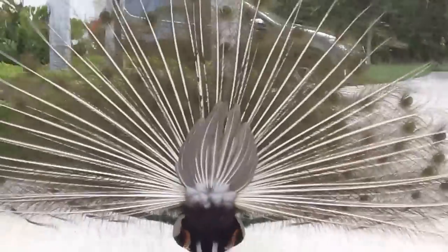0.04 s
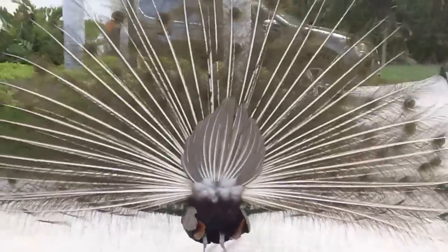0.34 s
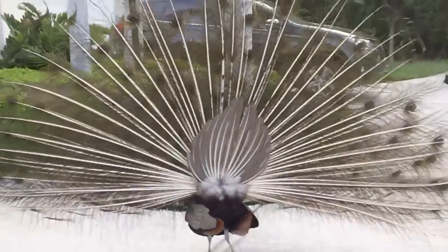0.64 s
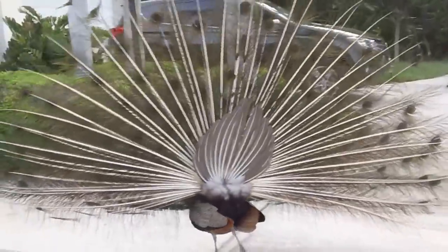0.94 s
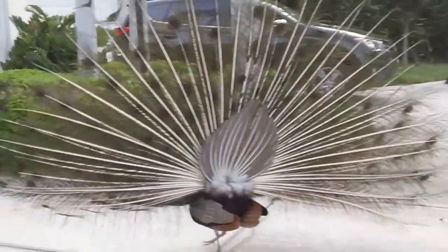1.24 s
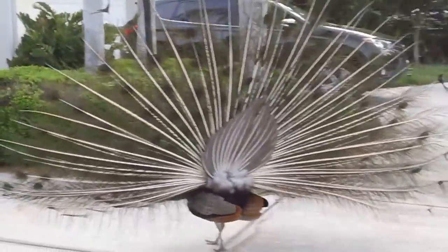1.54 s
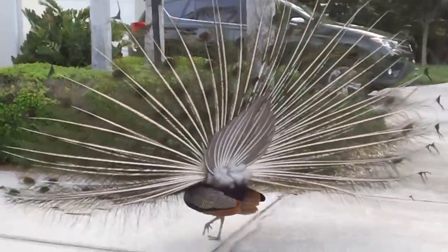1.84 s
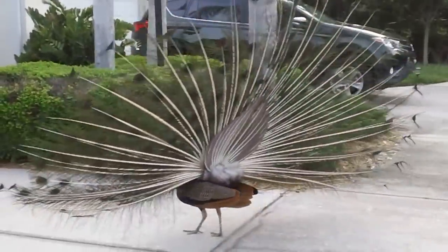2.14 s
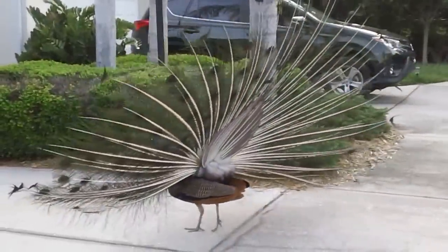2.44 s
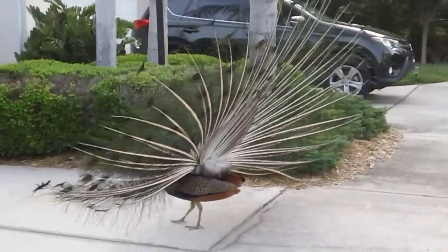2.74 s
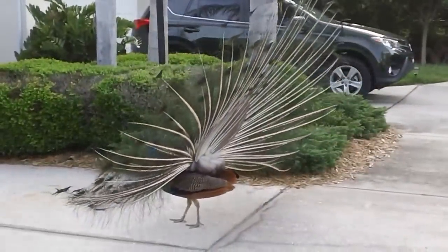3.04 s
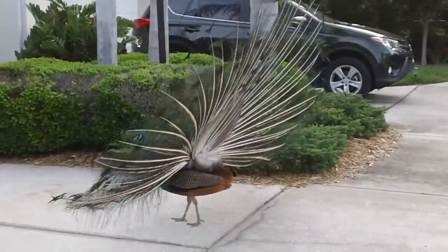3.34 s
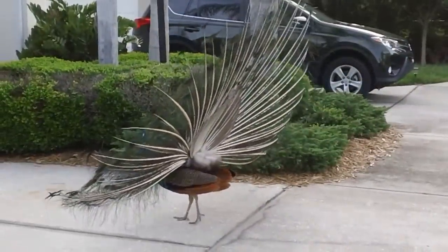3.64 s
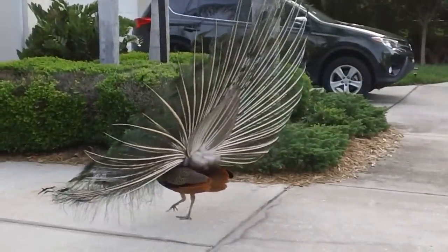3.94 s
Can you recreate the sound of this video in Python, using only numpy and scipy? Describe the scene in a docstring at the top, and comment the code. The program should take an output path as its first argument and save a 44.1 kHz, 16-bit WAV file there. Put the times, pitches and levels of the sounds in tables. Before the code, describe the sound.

Peacock feathers click and rustle close by over a low roar of distant traffic.

```python
"""Dry clicks, knocks and rustles of a peacock's fanned train, close up, as it turns on a concrete drive.
Stiff quills skid and knock together, vanes brush over each other in short strokes, and barbs unhook
with tiny ticks; the yard adds a short, dull scatter. Behind the bird the roar of distant traffic swells
and fades over a low rumble, open-air hiss and the faint hum of far engines."""
import sys
import numpy as np
from scipy import signal
from scipy.fft import rfft, irfft
from scipy.io import wavfile
from scipy.ndimage import uniform_filter1d

SR = 44100
rng = np.random.default_rng(int(sys.argv[2]) if len(sys.argv) > 2 else 0)


def generate_wav(sig):
    """Save sig (samples, or channels by samples) to the path in sys.argv[1] as 16-bit PCM at SR."""
    pcm = np.round(np.clip(np.atleast_2d(sig).T, -1, 1) * 32767).astype(np.int16)
    wavfile.write(sys.argv[1], SR, pcm)


N = 176400
QUILL_LOW_HZ = 970  # thin quills radiate little below this
# modes of a thick and a thin quill shaft: pitch_hz, gain_db, t60_s
THICK_SHAFT = [(1240, -15, 0.0067), (1600, -1.5, 0.0072), (2230, 2, 0.0037), (2500, -1.5, 0.011),
               (5000, -0.5, .0025)]
THIN_SHAFT = [(2180, -9, 0.0043), (3850, 2, 0.0037), (5900, -7, 0.0017)]


def amp(db):
    """Decibels to gain."""
    return 10 ** (np.asarray(db) / 20)


def unit(x):
    """Scales to rms 1."""
    return x / np.sqrt(np.mean(x ** 2) + 1e-20)


def colour(x, points):
    """EQ curve through (freq_hz, gain_db) points."""
    freq_hz, gain_db = np.transpose(points)
    hz = np.fft.rfftfreq(len(x), 1 / SR)
    return irfft(rfft(x) * amp(np.interp(np.log(hz + 1), np.log(freq_hz + 1), gain_db)), len(x))


def fader(points):
    """Gain ride through (time_s, level_db) points."""
    return amp(np.interp(np.arange(N) / SR, *np.transpose(points)))


def drift(rate_hz):
    """Smooth random motion of rms 1, mostly slower than rate_hz."""
    hz = np.fft.rfftfreq(N, 1 / SR)
    return unit(irfft(rfft(rng.standard_normal(N)) * (hz > 0) / (1 + (hz / rate_hz) ** 4), N))


def add(mix, start_s, sound):
    """Mixes a sound in at start_s."""
    part = mix[max(round(start_s * SR), 0):][:len(sound)]
    part += sound[:len(part)]


def noise_bed(eq, patch_db=1.23):
    """Coloured noise whose level drifts in patches of time and frequency."""
    spectrum = signal.stft(rng.standard_normal(N), nperseg=1024, noverlap=768)[2]
    patches = uniform_filter1d(rng.standard_normal(spectrum.shape), size=5, axis=0)
    patches = unit(uniform_filter1d(patches, size=20, axis=1))
    noise = signal.istft(spectrum * amp(patch_db * patches), nperseg=1024, noverlap=768)[1][:N]
    return unit(colour(noise, eq))


def barb_slips(per_s, spread_db):
    """Tiny random slips of barb over barb, a few of them large."""
    size = amp(spread_db * np.minimum(rng.exponential(1, N), 4))
    return unit(size * rng.choice([-1., 1.], N) * (rng.random(N) < per_s / SR))


def mic_hiss():
    """The faint self-noise of the microphones."""
    # hiss colour: freq_hz, gain_db
    hiss_eq = [(350, -4), (1000, -29), (2200, -18), (5000, 7), (10000, 3.5), (15000, -5)]
    return amp(-66) * unit(colour(rng.standard_normal(N), hiss_eq))


def ambience():
    """Distant traffic roars over a rumble of wind and engines and the even hiss of open air."""
    # swells of the roar and the rumble: time_s, level_db
    traffic_ride = [(0, -37.5), (.35, -36), (.6, -37.5), (1.55, -35.5), (2.2, -39), (2.7, -40.5), (4, -44)]
    rumble_ride = [(0, -41), (.8, -42), (1.35, -38), (1.8, -42.5), (4, -45.5)]
    # colours of the roar, the rumble and the air: freq_hz, gain_db
    traffic_eq = [(100, -33), (500, -6.5), (625, 1), (1000, 0.5), (1550, -6), (1900, -12), (6000, -52)]
    rumble_eq = [(18, -24.5), (62, -5.5), (100, -1.5), (180, 1), (290, -8.5), (1500, -37.5)]
    air_eq = [(100, 0.5), (540, 13), (1500, -7), (6000, -7.5), (9000, -10.5), (11500, -22.5), (15000, -23)]
    traffic = fader(traffic_ride) * noise_bed(traffic_eq)
    rumble = fader(rumble_ride) * noise_bed(rumble_eq)
    return traffic + rumble + amp(-47) * noise_bed(air_eq)


def engine_hum():
    """Faint wavering tones of far engines come and go."""
    # engine tones: peak_s, half_length_s, level_db, pitch_hz, waver_hz
    engines = [(1.6, 1.54, -54.5, 158, 4.08), (0.97, 0.27, -50, 396, 1.2), (3.04, .4, -52.5, 474, 1.4),
               (3.4, 0.87, -50, 630, 17.7)]
    out, t = np.zeros(N), np.arange(N) / SR
    for peak_s, half_length_s, level_db, pitch_hz, waver_hz in engines:
        swell = np.exp(-.5 * ((t - peak_s) / half_length_s) ** 2)
        phase = 2 * np.pi * np.cumsum(pitch_hz + waver_hz * drift(rate_hz=12.4)) / SR
        out += np.sqrt(2) * amp(level_db) * swell * np.sin(phase)
    return out


def tyres(width_hz=294):
    """Tyres sing in a band of noise whose centre shifts as the cars pass."""
    # the singing band: time_s, level_db, centre_hz
    tyre_song = [(.2, -40, 847.4), (.75, -47, 952.6), (1.5, -42.5, 1061), (2.1, -42.5, 900.6),
                 (2.8, -47.5, 940.4), (4, -50, 950)]
    time_s, level_db, centre_hz = np.transpose(tyre_song)
    t = np.arange(N) / SR
    band = drift(width_hz / 2) + 1j * drift(width_hz / 2)
    carrier = np.exp(2j * np.pi * np.cumsum(np.interp(t, time_s, centre_hz)) / SR)
    return amp(np.interp(t, time_s, level_db)) * (band * carrier).real


def yard(x, wet_db=-15, t60_s=0.14, damping_hz=5000):
    """Adds a short dull scatter from the drive, hedge and walls."""
    t = np.arange(SR // 3) / SR
    tail = rng.standard_normal(len(t)) * np.exp(-np.log(1000) * t / t60_s)
    tail = signal.lfilter(*signal.butter(1, damping_hz, fs=SR), tail)
    return x + amp(wet_db) * signal.fftconvolve(x, tail / np.linalg.norm(tail))[:N]


def barb_crackle(low_cut_hz=8200):
    """Single barbs unhook with sparse, bright ticks."""
    # strength of the crackle: time_s, level_db
    crackle_ride = [(0, -54.5), (1.4, -73), (4, -59.5)]
    highpass = signal.butter(2, low_cut_hz, "high", fs=SR)
    return fader(crackle_ride) * unit(signal.lfilter(*highpass, barb_slips(per_s=200, spread_db=2.5)))


def train_rustle(flutter_db=1.04):
    """The whole train whispers with slipping barbs while the bird turns."""
    # strength of the rustle: time_s, level_db
    rustle_ride = [(0, -47.5), (.48, -50.5), (.8, -45.5), (1.4, -47.5), (2.3, -51.5), (4, -57)]
    # its papery colour: freq_hz, gain_db
    rustle_eq = [(300, -23), (1200, 2.5), (2200, 11), (4000, 3), (7000, -5.5), (12000, -24)]
    slips = barb_slips(per_s=3500, spread_db=2.5) * amp(flutter_db * drift(rate_hz=19))
    return fader(rustle_ride) * unit(colour(slips, rustle_eq))


def vane_brushes(width_octaves=0.81, fizz_db=-23, ring_db=3, shaft_q=4.8, clump_db=3):
    """Vane brushes vane: each stroke is a swell of slips, coloured by the shaft that it rubs."""
    # brush strokes: peak_s, fall_s, level_db, bright_hz
    strokes = [(0.374, 0.0062, -25, 2820), (.412, 0.02, -38.5, 3000), (0.524, 0.012, -46, 4170),
               (0.693, 0.04, -44, 3860), (1.120, 0.008, -39.5, 4570), (1.446, 0.0062, -44, 4200),
               (1.802, 0.0055, -36.5, 7460), (1.856, 0.024, -44, 7750), (1.894, 0.012, -37, 1740),
               (1.98, 0.16, -55.5, 8100), (2.038, 0.0083, -35, 4780), (2.190, 0.0042, -36, 6800),
               (2.391, 0.0035, -35.5, 1260), (2.657, 0.0023, -34, 2440), (2.956, 0.0046, -41, 4560),
               (3.471, 0.0068, -48, 3880), (3.731, 0.0037, -37, 2200)]
    # the barbs catch and let go in clumps
    slips = barb_slips(per_s=9100, spread_db=3) * amp(clump_db * drift(rate_hz=170))
    out, size = np.zeros(N), 2 ** 15
    hz = np.fft.rfftfreq(size, 1 / SR) + 1
    fizz = amp(fizz_db) * hz / (hz + QUILL_LOW_HZ)
    for peak_s, fall_s, level_db, bright_hz in strokes:
        span = round(peak_s * SR) - size // 2 + np.arange(size)
        ratio = hz / bright_hz
        bright_band = np.exp(-.5 * (np.log2(ratio) / width_octaves) ** 2)
        # the shaft resonates at the band's centre and an octave above
        ring = sum(amp(ring_db) / k / (1 + 1j * shaft_q * (ratio / k - k / ratio)) for k in (1, 2))
        rub = irfft(rfft(np.take(slips, span, mode="wrap")) * (bright_band + fizz + ring))
        past_peak = (span / SR - peak_s) / fall_s
        swell = np.exp(-np.minimum(past_peak, 0) ** 2 - np.maximum(past_peak, 0))
        add(out, span[0] / SR, amp(level_db) * swell * unit(rub))
    return out


def quill_click(level_db, pitch_hz, decay_cycles=1.28, snap_hz=11800, chatter_s=0.0021):
    """One quill skids off another: a slip and a brief chatter, each with a snap and a very short ring."""
    t = np.arange(400) / SR
    ring = np.exp(-t * pitch_hz / decay_cycles) * np.sin(2 * np.pi * pitch_hz * t)
    snap = np.exp(-2 * np.pi * snap_hz * abs(t - 1 / SR))
    # snap and chatter grow more slowly than the ring, so hard blows are cleaner
    snap_db, chatter_db = -8.5 + 0.45 * level_db, -21 - 0.55 * level_db
    slips = rng.standard_normal(len(t)) * np.exp(-t / chatter_s)
    slips *= amp(chatter_db) / np.linalg.norm(slips)
    slips[0] = 1  # the first slip
    return np.convolve(slips, amp(level_db) * ring + amp(snap_db) * snap)


def shaft_knock(level_db, modes):
    """Shaft strikes shaft and rings in a few fast-dying modes."""
    t = np.arange(2000) / SR
    return sum(amp(level_db + gain_db) * np.exp(-np.log(1000) * t / t60_s) * np.sin(2 * np.pi * hz * t)
               for hz, gain_db, t60_s in modes)


def quills():
    """Stiff quills meet in light skidding clicks and in knocks that ring a whole shaft."""
    # quill skids: start_s, level_db, pitch_hz
    clicks = [(0.2959, -21.5, 8000), (0.3135, -27, 8500), (.3341, -31, 7500), (0.3714, -15, 6200),
              (0.3764, -7, 4500), (0.3938, -20, 3620), (.4177, -27, 5600), (0.451, -36, 6200),
              (0.531, -37, 8100), (.7600, -34, 11000), (1.1029, -19, 6200), (1.1370, -30, 6844),
              (1.4343, -29, 3300), (1.4464, -20, 2950), (1.6185, -30, 6900), (1.6910, -31, 4900),
              (1.8390, -25, 7000), (1.8556, -20, 7700), (1.8772, -19, 4500), (1.8794, -20, 6500),
              (1.8926, -27, 5000), (2.183, -28, 7700), (2.1887, -17, 7000), (2.2667, -32.5, 5500),
              (2.6472, -30, 4607), (2.6553, -32, 5060), (3.4693, -28, 5170), (3.4760, -27.5, 2940),
              (3.7318, -32, 6500)]
    # blows of shaft on shaft: start_s, level_db, modes
    knocks = [(.3801, -10, THICK_SHAFT), (1.3882, -11, THIN_SHAFT), (2.2255, -28, THIN_SHAFT),
              (2.3570, -34.5, THIN_SHAFT), (2.3890, -30, THIN_SHAFT), (2.6560, -29.5, THICK_SHAFT),
              (3.7322, -32, THICK_SHAFT)]
    out = np.zeros(N)
    for start_s, level_db, pitch_hz in clicks:
        add(out, start_s, quill_click(level_db, pitch_hz))
    for start_s, level_db, modes in knocks:
        add(out, start_s, shaft_knock(level_db, modes))
    return signal.sosfilt(signal.butter(2, QUILL_LOW_HZ, "high", fs=SR, output="sos"), out)


def scene():
    """Feathers and background sit in the centre; only the microphones' own hiss has width."""
    feathers = quills() + vane_brushes() + train_rustle() + barb_crackle()
    mid = yard(feathers) + ambience() + tyres() + engine_hum()
    side = mic_hiss()
    return np.array([mid + side, mid - side])


def record(dry):
    """The microphone port notches the high treble, and a steep low-pass cuts it at 16 kHz."""
    # microphone colour: freq_hz, gain_db
    mic_eq = [(11000, -0.5), (12000, -11.5), (12550, -27), (13200, -3.5), (15200, 1), (15700, -10)]
    heard = np.array([colour(channel, mic_eq) for channel in dry])
    lowpass = signal.firwin(511, 16000, window=("kaiser", 9), fs=SR)
    return signal.oaconvolve(heard, lowpass[None], "same")


dry = scene()
out = record(dry)
generate_wav(out)
```